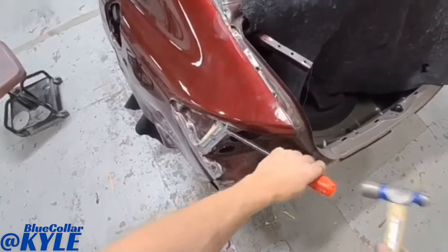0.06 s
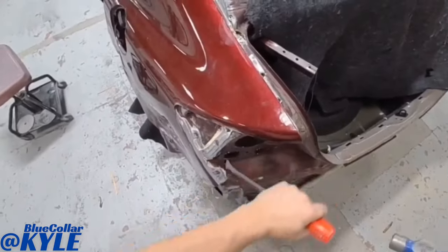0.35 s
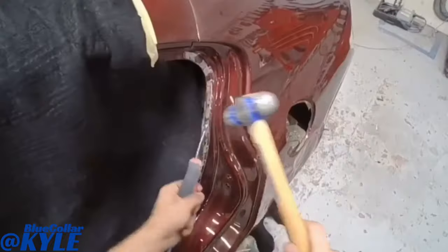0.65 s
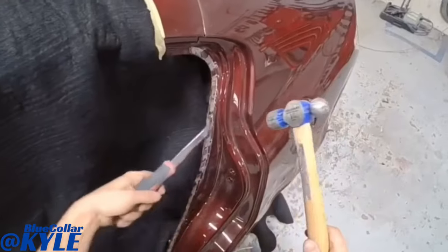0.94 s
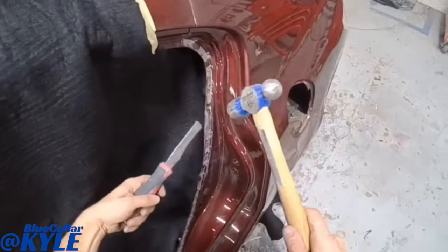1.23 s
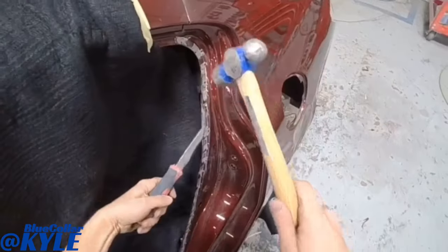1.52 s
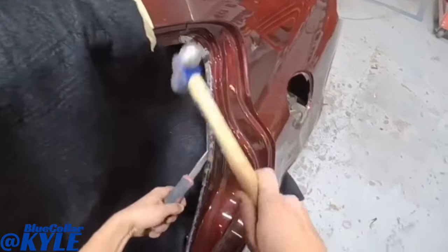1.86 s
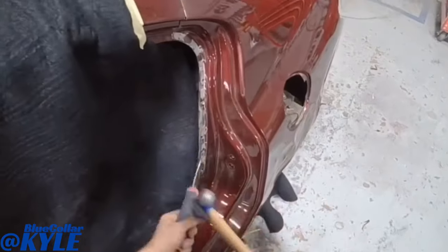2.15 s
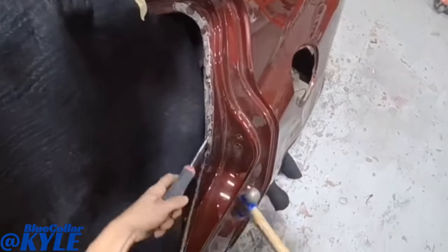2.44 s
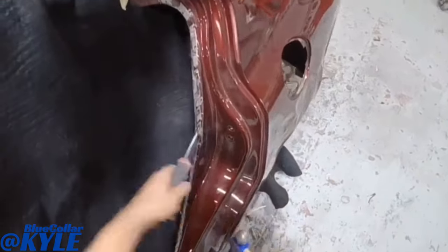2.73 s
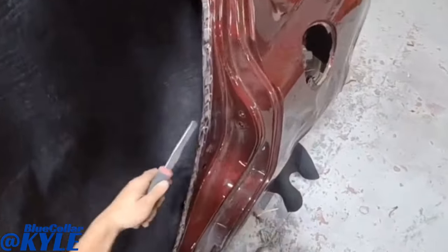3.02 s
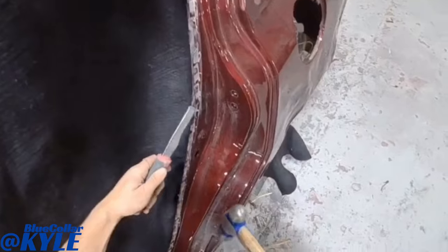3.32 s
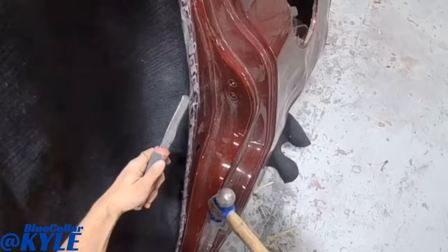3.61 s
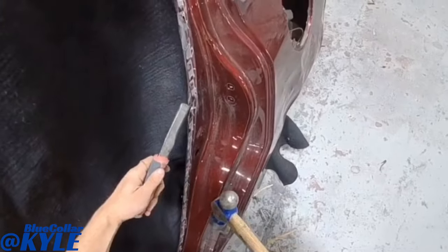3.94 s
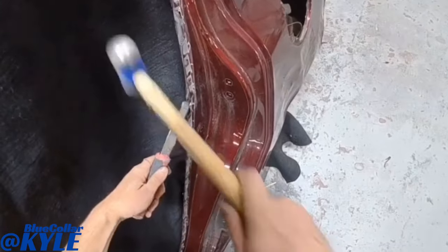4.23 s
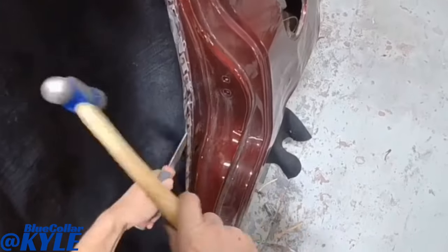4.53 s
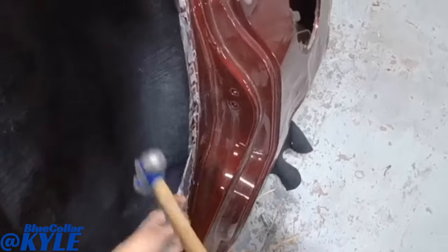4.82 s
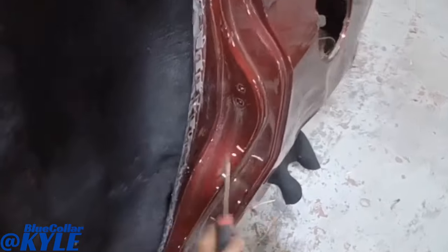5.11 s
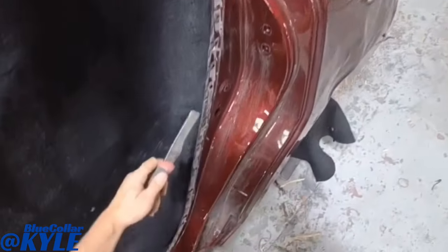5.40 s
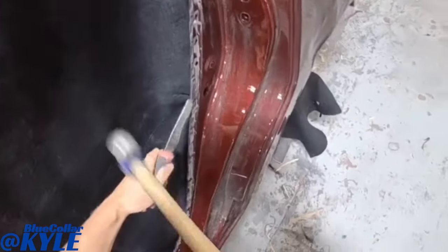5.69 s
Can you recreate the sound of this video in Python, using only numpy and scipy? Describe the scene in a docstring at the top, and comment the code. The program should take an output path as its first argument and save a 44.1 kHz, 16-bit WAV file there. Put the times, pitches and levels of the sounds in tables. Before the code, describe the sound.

In an echoing repair workshop, a power tool hisses briefly in the background and fades to a faint whine. Close by, a hammer hits a chisel set in a car body seam, each blow a sharp metallic crack with a short, dull panel boom. One blow comes first, then two quick runs and a last hit. Between them the blade clinks, scrapes and squeaks on the steel, over a low handling rumble on the microphone.

```python
"""Chiselling a car body seam

In a repair workshop a hammer drives a chisel into a seam of the steel body. Each blow cracks on the
chisel; milliseconds later the seam gives, the damped panel booms and the hall rings. Between runs the
blade is set, scraped and rubbed until it squeaks. Close handling rumbles; further off a power tool
hisses briefly, then only whines."""
import sys
import numpy as np
from scipy import signal
from scipy.fft import rfft, irfft
from scipy.io import wavfile

SR = 44100
rng = np.random.default_rng(int(sys.argv[2]) if len(sys.argv) > 2 else 0)


def generate_wav(sig):
    """Save sig (samples, or channels by samples) to the path in sys.argv[1] as 16-bit PCM at SR."""
    pcm = np.round(np.clip(np.atleast_2d(sig).T, -1, 1) * 32767).astype(np.int16)
    wavfile.write(sys.argv[1], SR, pcm)


N = 258426
TIME = np.arange(N) / SR
HZ = np.maximum(np.fft.rfftfreq(N, 1 / SR), 1)
CHISEL_RISE_S, CHISEL_T60_S = 0.00033, 0.051

# Hammer blows: start_s, strength_db, hardness_db_per_band, bass_db, hall_send_db, give_lag_s, give_db,
# boom_hz, boom_db, boom2_hz, boom2_db, boom_t60_s, chisel_hz, chisel_db, side_modes_db,
# blade_tone_hz, blade_tone_db, hammer_ring_db
HAMMER_BLOWS = [(0.591, -18, -1, -16, -5.5, .018, -16.5, 321, -9.5, 425, -9, 0.06, 2200, -15.5, 0.5, 1077, -12.5, -53),
                (1.6247, -15.5, 3.5, 3.5, -9.5, 0.0084, -24.5, 400, -13.5, 647, -36, 0.057, 2426, -10, -8, 1970, -13.5, -38),
                (1.912, -12.5, 0.15, 1.5, -1.5, 0.0037, -35, 658, -16.5, 395, -20, 0.084, 2740, -11, 2, 9400, -16, -35.5),
                (2.056, -22.5, -2.5, -6, -13, 0.0018, -36.5, 907, -24, 290, -29.5, .06, 2500, -31, 1, 690, -32, -52),
                (2.2675, -25, -6.5, -13, -4, 0.0023, -43.5, 822, -20.5, 1437, -22, 0.065, 2630, -14, -3, 2030, -20, -96),
                (4.2744, -17, 3, 4, -10, 0.0083, -16.5, 1307, -12, 1560, -17, .07, 2410, -13.5, 3, 4980, -15, -38),
                (4.542, -12.5, 0.25, 0, 0, 0.0012, -30, 391, -4, 314, -9, 0.054, 2477, -5, -8, 4380, -4.5, -58),
                (4.798, -20, -5.5, -5.5, -10, 0.00288, -28, 256, -16, 477, -22.5, 0.077, 2310, -19.5, -5.5, 5300, -28, -51),
                (4.869, -28, 0, 1, -2.5, 0.017, -25.5, 271, -15, 417, -24, 0.065, 2240, -28, 8, 7080, -34, -53),
                (4.938, -13, -8.5, -8, -10.5, 0.002, -32.5, 261, -4.5, 516, -19, 0.039, 1816, -16, -7, 2360, -18, -81),
                (5.8135, -17.5, -0.5, 5.5, -1.5, 0.0023, -21, 765, -18.5, 448, -14, 0.099, 2520, -21, -3, 4780, -15.5, -33)]
# Light tool touches on the steel: start_s, strength_db, hardness_db_per_band, drag_s, clink_hz, clink_db
TOOL_TOUCHES = [(0.066, -43.5, 3.5, 0.006, 4680, -25.5), (0.277, -39, -8, 0.0064, 1930, -34),
                (0.79, -39.5, -8.5, 0.028, 2100, -36), (0.827, -41.5, -13.5, .004, 1760, -35),
                (0.878, -42, -13.5, .022, 2300, -35), (0.95, -44, -13, 0.021, 2000, -42),
                (1.267, -38.5, -3, .004, 1210, -24.5), (1.383, -35.5, -7.5, .028, 2120, -47),
                (1.455, -46, -5, 0.033, 2550, -36.5), (2.18, -57, 3, .005, 2400, -55.5),
                (2.473, -44, -6, .005, 2494, -24), (2.598, -39, -7.5, .006, 1930, -44),
                (3.054, -42, -8, 0.0038, 1030, -26), (3.07, -51, -8, 0.0022, 926, -30),
                (3.26, -47, -10, 0.0081, 1500, -42), (3.336, -39.5, -5, 0.0052, 2380, -27.5),
                (3.43, -43.5, -5, .016, 2200, -39), (4.292, -35, -8, 0.0015, 785, -13.5),
                (4.551, -23, -5, 0.0022, 2500, -12), (4.7947, -36, 1.5, 0.0015, 2300, -36),
                (4.867, -27, -10.5, .002, 2320, -37), (5.265, -53.5, -5, .025, 2620, -40),
                (5.453, -33.5, -6.5, 0.0021, 2320, -45), (5.791, -45, -0.5, .004, 2400, -31),
                (5.802, -24, -4.5, 0.01, 2460, -28)]


def from_db(db):
    """Decibels to gain."""
    return 10 ** (np.asarray(db) / 20)


def rms_one(x):
    """Scale to unit rms."""
    return x / np.sqrt(np.mean(x ** 2) + 1e-20)


def curve(points):
    """(time_s, value) points interpolated at every sample."""
    return np.interp(TIME, *np.transpose(points))


def colour(points):
    """Gain spectrum from (freq_hz, level_db) points, rolling off below the first."""
    hz, db = np.transpose(points)
    return from_db(np.interp(np.log(HZ), np.log(hz), db)) * np.minimum(HZ / hz[0], 1) ** 3


def band_gain(low_hz, high_hz):
    """Steep band-pass gain."""
    return 1 / np.sqrt((1 + (low_hz / HZ) ** 12) * (1 + (HZ / high_hz) ** 16))


def peak(hz, width_hz):
    """Resonance curve, height 1."""
    return 1 / (1 + (2 * (HZ - hz) / width_hz) ** 2)


def noise(gain):
    """Noise shaped by a gain spectrum, rms 1."""
    return rms_one(irfft(rfft(rng.standard_normal(N)) * gain, N))


def wander(rate_hz):
    """Slow random drift, rms 1."""
    return noise(1 / (1 + (HZ / rate_hz) ** 2))


def decay(t, t60_s):
    """Fall of 60 dB in t60_s."""
    return np.exp(-np.log(1000) * t / t60_s)


def swell(t, rise_s):
    """Smooth onset."""
    return 1 - np.exp(-t / rise_s)


def add(track, start_s, sound):
    """Mix a sound into a track."""
    at = int(start_s * SR)
    track[at:at + len(sound)] += sound[:max(N - at, 0)]


def mode(hz, db, rise_s, t60_s):
    """One struck mode: a damped sine."""
    t = TIME[:SR // 6]
    return from_db(db) * swell(t, rise_s) * decay(t, t60_s) * np.sin(2 * np.pi * hz * t)


def hall(sent_power, early_db, late_db, late_t60_s, delay_s=0.023):
    """Echo power: floor and car body answer first, then the hall rings on."""
    t, out, echoes = TIME[:SR + SR // 2], np.zeros(N), 0
    for db, rise_s, t60_s in ((early_db, 0.05, 0.079), (late_db, 0.019, late_t60_s)):
        power = (swell(t, rise_s) * decay(t, t60_s)) ** 2
        echoes = echoes + from_db(db) ** 2 * power / power.sum()
    add(out, delay_s, np.maximum(signal.fftconvolve(sent_power, echoes), 0))
    return out


def shell_echoes(x, echo_db=-13, t60_s=0.26, rise_s=0.012):
    """The hollow body and the floor return a short wash of echoes."""
    t = TIME[:SR // 2]
    echoes = rng.standard_normal(len(t)) * swell(t, rise_s) ** 2 * decay(t, t60_s)
    return from_db(echo_db) * signal.fftconvolve(x, echoes / np.linalg.norm(echoes))[:N]


def workshop_air():
    """Broad room noise of drifting level."""
    spectrum = [(150, -35), (250, -4.5), (325, -11), (510, -5.5), (971, -3), (1500, -6.5), (1980, -4),
                (2810, -17), (3980, -17.5), (5440, -27), (9830, -37.5), (13900, -46.5), (16000, -79)]  # freq_hz, relative_db
    levels = [(0, -46.5), (.55, -52.5), (.75, -48), (1.1, -48), (2.4, -43.5), (2.8, -44.5), (3.7, -48),
              (4.15, -49), (4.25, -39), (4.4, -43), (5.2, -49.5), (5.86, -45.5)]  # time_s, level_db
    return from_db(curve(levels)) * noise(colour(spectrum))


def handling_rumble(gain_db=6, lump_db=4.5, lump_hz=12, top_hz=600):
    """Close handling: low, lumpy noise."""
    spectrum = [(15, -60), (25, -28), (59, -0.5), (85, 2.5), (167, 2.5), (226, -6.5), (316, -3), (354, -11),
                (700, -13.5), (910, -58), (1540, -120)]  # freq_hz, relative_db
    levels = [(0.52, -76), (0.6, -55), (0.73, -50.5), (1.13, -45.5), (1.4, -42.5), (1.68, -53), (2.41, -52),
              (2.84, -44.5), (3.49, -49.5), (3.72, -45.5), (4.39, -51.5), (5.44, -51), (5.53, -36.5),
              (5.68, -47.5), (5.86, -49)]  # time_s, relative_db
    level_db = curve(levels) + gain_db + lump_db * np.tanh(wander(lump_hz))
    return from_db(level_db) * noise(colour(spectrum) * band_gain(1, top_hz))


def power_tool(stop_s=0.567, fade_t60_s=0.56, hiss_db=-43.5, whine_hz=1999, whine_width_hz=76):
    """Hiss while the tool works; a wavering whine, its lines smeared by the hall, carries on."""
    hiss_spectrum = [(90, -2.5), (140, 10.5), (235, 16), (370, 7), (600, 9), (720, -3), (1600, -7),
                     (1900, -4.5), (3000, -4), (4900, -6), (5700, -15.5), (8200, -18.5), (11000, -27),
                     (16000, -36)]  # freq_hz, relative_db
    whine_levels = [(0.5, -78), (0.62, -57), (0.8, -46), (1.05, -53), (1.55, -50), (2.4, -57), (3.2, -50.5),
                    (3.8, -57.5), (4.86, -61), (5.12, -59), (5.5, -56), (5.6, -44), (5.7, -50), (5.86, -46)]  # time_s, level_db
    upper_lines = [(4080, 130, -58, -70.5), (8000, 70, -72, -93.5)]  # pitch_hz, width_hz, working_db, idle_db
    working = decay(np.maximum(TIME - stop_s, 0), fade_t60_s)
    hiss = from_db(hiss_db) * working * noise(colour(hiss_spectrum))
    whine = from_db(curve(whine_levels)) * noise(peak(whine_hz, whine_width_hz))
    for hz, width_hz, working_db, idle_db in upper_lines:
        whine += from_db(idle_db + (working_db - idle_db) * working) * noise(peak(hz, width_hz))
    return hiss + whine


def grit(grains_per_s=600, spread_db=5.5, t60_s=0.03):
    """Paint and rust grains catch under the blade: power, mean 1."""
    caught = rng.random(N) < grains_per_s / SR
    size_db = spread_db * np.minimum(rng.exponential(1, N), 3)
    power = signal.lfilter([1], [1, -decay(1 / SR, t60_s)], caught * from_db(size_db) ** 2 + 1e-12)
    return power / power.mean()


def rubbing(attack_s=0.034, waver_depth=0.025, waver_hz=30, rough_hz=110):
    """The blade rubs the seam: a rough, wavering squeak over a gritty rustle that lingers in the hall."""
    rubs = [(2.55, 0.19, 2056, -45.5, -8, -46), (2.716, 0.14, 1804, -37, -8, -44),
            (2.843, 0.12, 1830, -40, -8, -55), (2.945, 0.13, 2000, -44, -15, -51.5),
            (3.268, 0.15, 2056, -40.5, -21, -46), (3.945, 0.1003, 1923, -34, -15.5, -44.5),
            (4.026, 0.14, 1883, -41.5, -17, -58.5), (4.14, 0.099, 1924, -36.5, -16, -52.5),
            (4.216, 0.056, 1890, -28, -27, -58), (5.486, 0.14, 2170, -56, -9, -38.5),
            (5.577, 0.069, 2080, -38.5, -21, -59)]  # start_s, length_s, pitch_hz, squeak_db, overtone_relative_db, rustle_db
    rustle_spectrum = [(700, 10.5), (1300, 2.5), (2300, 14), (2850, -6), (3600, 1), (5400, -4.5),
                       (7100, -3.5), (10000, -13.5), (13500, -16), (16000, -35)]  # freq_hz, relative_db
    squeak_level, overtone_level, rustle_level = np.zeros((3, N))
    for start_s, length_s, _, squeak_db, overtone_db, rustle_db in rubs:
        t = TIME[:int(length_s * SR)]
        pressure = swell(t, attack_s) * np.cos(np.pi / 2 * t / length_s)
        add(squeak_level, start_s, from_db(squeak_db) * pressure)
        add(overtone_level, start_s, from_db(squeak_db + overtone_db) * pressure)
        add(rustle_level, start_s, from_db(rustle_db) * np.sin(np.pi * t / length_s))
    pitch_hz = curve([(start_s + length_s / 2, hz) for start_s, length_s, hz, *_ in rubs])
    phase = 2 * np.pi * np.cumsum(pitch_hz * (1 + waver_depth * wander(waver_hz))) / SR
    squeak = 0
    for ratio, level in ((1, squeak_level), (1.918, overtone_level), (3.6, from_db(-10.5) * overtone_level)):
        squeak += level * rms_one(wander(rough_hz * ratio) * np.sin(ratio * phase))
    rustle_power = rustle_level ** 2 * grit()
    rustle_power += hall(rustle_power, early_db=-10.5, late_db=-9, late_t60_s=1)
    return squeak + np.sqrt(rustle_power) * noise(colour(rustle_spectrum))


def slips(rate_hz=220):
    """Uneven stick-slip contacts of the scraping blade: start_s, strength_db, hardness_db_per_band."""
    scrapes = [(2.682, 2.693, -27.5, -6, -5.5), (2.699, 2.741, -36.5, -5.5, 3.5),
               (4.222, 4.268, -50.5, -8.5, -8), (5.498, 5.555, -47, -14.5, -11)]  # start_s, end_s, strength_db, hardness_db_per_band, change_db
    rows = []
    for start_s, end_s, db, hardness, change_db in scrapes:
        for at_s in np.arange(start_s, end_s, 1 / rate_hz):
            progress = (at_s - start_s) / (end_s - start_s)
            jitter_s = rng.random() / rate_hz / 2
            rows.append((at_s + jitter_s, db + change_db * progress, hardness))
    return rows


def hammer_ring(t60_s=0.62, rise_s=0.0009):
    """A square hit leaves the hardened head singing, its modes smeared by the hall."""
    head_modes = [(4200, 1200, 2), (7300, 3000, -3.5), (9350, 370, -1), (14300, 1500, -21)]  # pitch_hz, width_hz, relative_db
    t, power = TIME[:SR], np.zeros(N)
    for start_s, *_, ring_db in HAMMER_BLOWS:
        add(power, start_s, (from_db(ring_db) * swell(t, rise_s) * decay(t, t60_s)) ** 2)
    spectrum = sum(from_db(db) * peak(hz, width_hz) for hz, width_hz, db in head_modes)
    return np.sqrt(power) * noise(spectrum)


def chisel_ring(main_hz, main_db, side_db, main_t60_s, spread_db=5, dulling_per_octave=0.37):
    """Main mode plus side modes that vary with the blade's seating; only hard blows wake the high ones."""
    side_modes = [(816, -19, 0.17), (1182, -13, 0.1), (1415, -10, 0.06), (1545, -12.5, 0.1),
                  (2004, -5, 0.033), (2363, -5, 0.057), (2800, -12, 0.033), (3330, -8, 0.045),
                  (4070, -8, 0.069), (4670, -11.5, 0.03), (4900, -15, 0.027), (8300, -14.5, 0.035),
                  (9660, -17, .03)]  # pitch_hz, relative_db, t60_s
    out = mode(main_hz, main_db, CHISEL_RISE_S, main_t60_s)
    for k, (hz, mode_db, t60_s) in enumerate(side_modes):
        dulling_db = dulling_per_octave * main_db * max(np.log2(hz / main_hz), 0)
        db = main_db + side_db + mode_db + dulling_db + spread_db * rng.standard_normal()
        detune = rng.uniform(-0.036, 0.03)
        out += (-1) ** k * mode(hz * (1 + detune), db, CHISEL_RISE_S, t60_s)
    return out


def chisel(slip_hz=2267):
    """Blows ring the chisel, touches clink it, each slip plucks its main mode."""
    out = np.zeros(N)
    for start_s, *_, main_hz, main_db, side_db, tone_hz, tone_db, _ in HAMMER_BLOWS:
        add(out, start_s, chisel_ring(main_hz, main_db, side_db, CHISEL_T60_S))
        add(out, start_s, mode(tone_hz, tone_db, CHISEL_RISE_S, t60_s=0.037))
    for start_s, _, _, drag_s, clink_hz, clink_db in TOOL_TOUCHES:
        add(out, start_s + drag_s / 2, chisel_ring(clink_hz, clink_db, side_db=-6, main_t60_s=0.036))
    for start_s, db, _ in slips():
        add(out, start_s, mode(slip_hz, db + 0.5, CHISEL_RISE_S, CHISEL_T60_S))
    return out


def seam_boom(rise_s=0.0011):
    """The seam gives and booms two panel modes, set by where the edge sits."""
    boom = np.zeros(N)
    for start_s, _, _, _, _, lag_s, _, hz, db, hz2, db2, t60_s, *_ in HAMMER_BLOWS:
        add(boom, start_s + lag_s, mode(hz, db, rise_s, t60_s) + mode(hz2, db2, rise_s, t60_s))
    return boom + shell_echoes(boom)


def band_levels(db, hardness_db_per_band, bass_db=0):
    """Low, mid, high and top levels in dB: a hard contact tilts them up about the mid band."""
    steps = np.array([-1, 0, 1, 2])
    return db + hardness_db_per_band * steps + bass_db * (steps < 0)


def contacts(touch_t60_s=0.098, slip_t60_s=0.085, hit_t60_s=0.059, give_t60_s=0.1):
    """All contacts with the body: start_s, band_levels_db, drag_s, t60_s, hall_send_db."""
    rows = []
    for start_s, db, hardness, drag_s, *_ in TOOL_TOUCHES:
        rows.append((start_s, band_levels(db, hardness), drag_s, touch_t60_s, -7.5))
    for start_s, db, hardness in slips():
        rows.append((start_s, band_levels(db, hardness), 0, slip_t60_s, -21))
    for start_s, db, hardness, bass_db, send_db, lag_s, give_db, *_ in HAMMER_BLOWS:
        rows.append((start_s, band_levels(db, hardness, bass_db), 0, hit_t60_s, send_db))
        give_levels_db = band_levels(give_db, hardness - 3, bass_db=-4.5)  # a yielding seam is softer
        rows.append((start_s + lag_s, give_levels_db, 0, give_t60_s, send_db - 1.5))
    return rows


def dragged(power, drag_s):
    """A glancing contact spreads its energy over the drag."""
    push = np.hanning(max(int(drag_s * SR), 1) + 2)
    return np.maximum(signal.convolve(power, push / push.sum()), 0)


def panel(crack_t60_s=0.0049):
    """Crowded modes of the struck sheet steel; as bending waves, lows arrive later and last longer."""
    steel_spectrum = [(47, -47), (80, -14), (255, -7.5), (407, -10), (544, -3), (665, 1), (1270, -0.5),
                      (1450, -5), (2480, -8), (3240, -24.5), (4630, -30), (6610, -36.5), (9240, -40.5),
                      (14800, -45.5), (16500, -68.5)]  # freq_hz, relative_db
    resonances = [(162, 40, -1), (280, 110, -3), (367, 66.3, 5.5), (488, 68, -3.5), (653.4, 39, 7.5),
                  (1004, 27, 6), (1228, 70, 5.5), (1447, 14, 9), (1605, 60, 8), (1660, 170, -3.5),
                  (1815, 260, 7), (2355, 580, 1.5), (2840, 120, -8.5), (3290, 1400, 0.5), (4980, 2040, 7),
                  (8520, 1600, 2)]  # centre_hz, width_hz, lift_db
    bands = [(90, 500), (500, 2900), (2900, 6500), (6500, 16500)]  # low_hz, high_hz
    # Per band: gain_db, rise_s, crack_ratio, t60_ratio, early_echo_db, hall_db, hall_t60_s
    responses = [(1, 0.0041, 0.78, 1.1, -4, -10, 0.61), (4, 0.0013, 0.5, 1.13, -8, -8.5, 1.0),
                 (1, 0.00038, 2.14, 0.86, -12.5, -12.5, 0.97), (-4, 0.00023, 1.4, 0.68, -13, -27, 0.86)]
    lift_db = sum(db * peak(hz, width_hz) for hz, width_hz, db in resonances)
    steel = colour(steel_spectrum) * from_db(lift_db)
    t, out, hits = TIME[:SR // 3], np.zeros(N), contacts()
    for k, (gain_db, rise_s, crack_ratio, t60_ratio, *hall_settings) in enumerate(responses):
        direct, sent = np.zeros((2, N))
        crack = crack_ratio * decay(t, crack_t60_s)
        for start_s, levels_db, drag_s, t60_s, send_db in hits:
            envelope = swell(t, rise_s) * (decay(t, t60_s * t60_ratio) + crack)
            power = dragged((from_db(levels_db[k] + gain_db) * envelope) ** 2, drag_s)
            add(direct, start_s, power)
            add(sent, start_s, power * from_db(send_db) ** 2)
        out += noise(steel * band_gain(*bands[k])) * np.sqrt(direct + hall(sent, *hall_settings))
    return out


def scene():
    """All sources, mono."""
    chiselling = panel() + chisel() + seam_boom() + hammer_ring() + rubbing()
    return (chiselling + power_tool() + handling_rumble() + workshop_air())[None]


def record(dry, cutoff_hz=16500):
    """Soft overload on the hardest blows, then a steep low-pass."""
    rounded = dry / (1 + dry ** 4) ** 0.25
    return signal.sosfilt(signal.ellip(10, 0.2, 80, cutoff_hz, fs=SR, output="sos"), rounded)


dry = scene()
out = record(dry)
generate_wav(out)
```